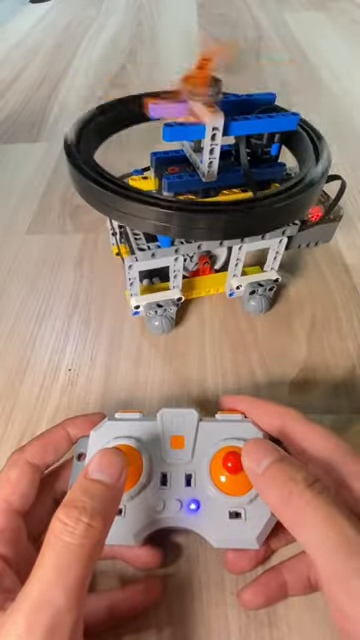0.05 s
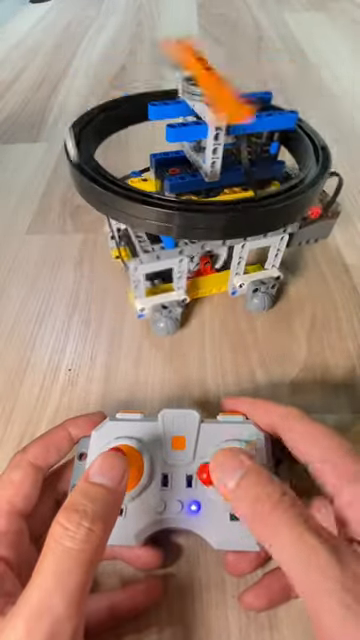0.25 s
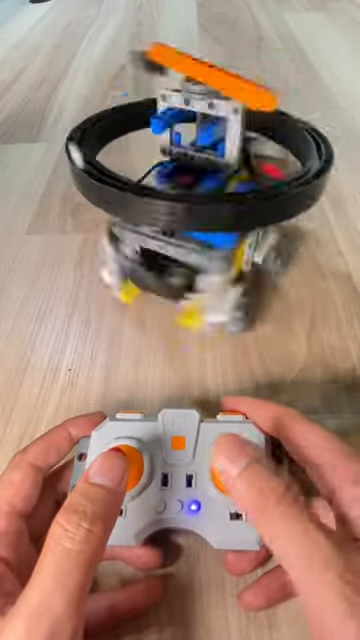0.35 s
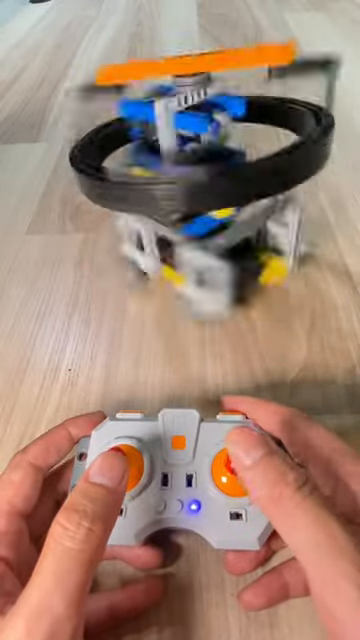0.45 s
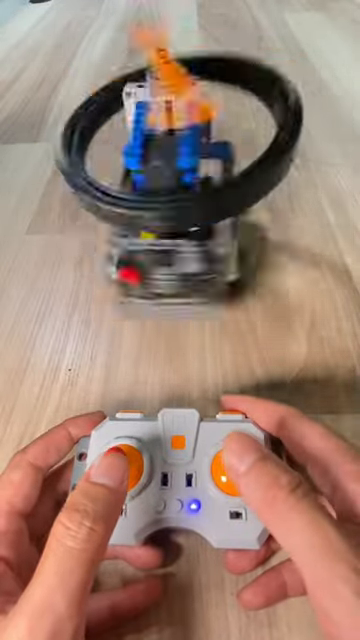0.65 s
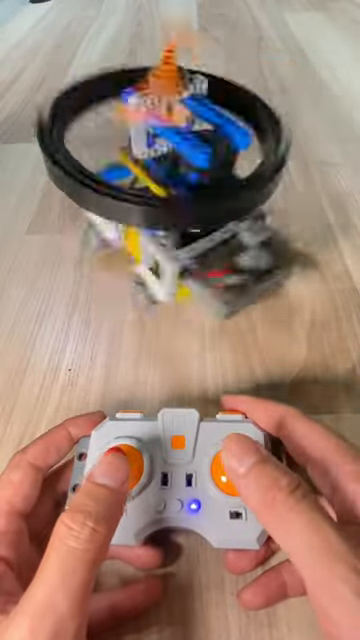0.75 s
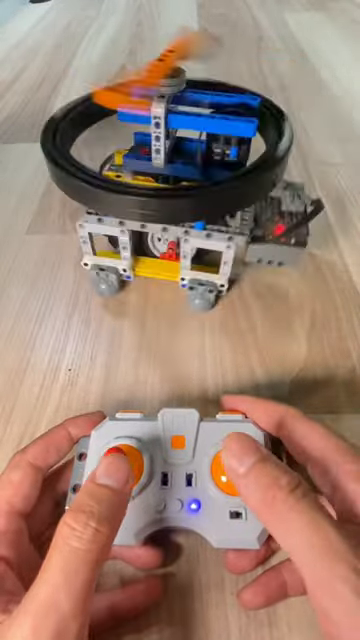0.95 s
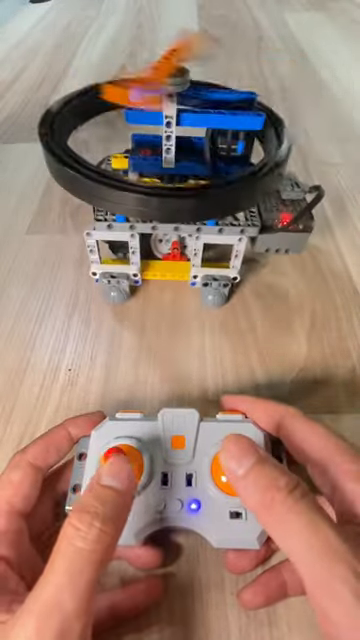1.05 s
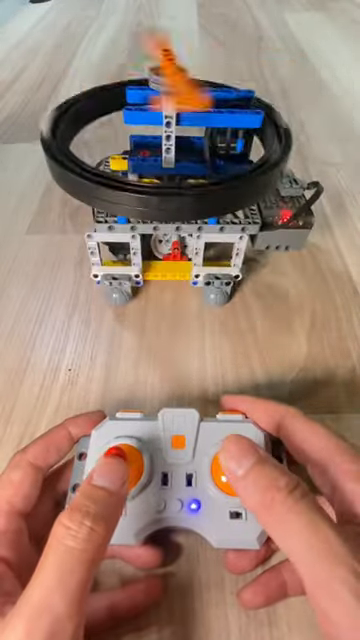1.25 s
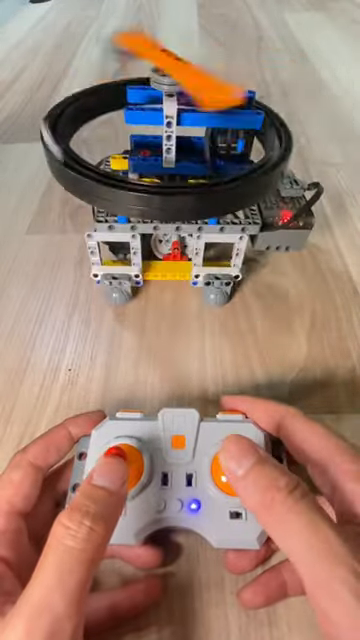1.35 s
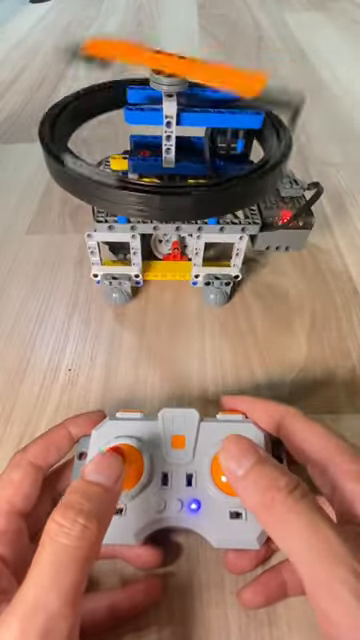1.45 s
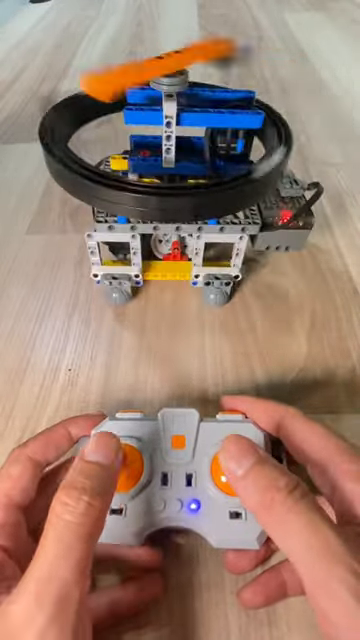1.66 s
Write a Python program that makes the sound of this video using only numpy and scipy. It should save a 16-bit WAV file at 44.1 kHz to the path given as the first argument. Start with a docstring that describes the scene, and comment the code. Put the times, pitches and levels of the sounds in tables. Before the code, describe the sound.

A small toy motor whines with hissy gear whirr, clicks as the drive engages, then wheels grind and jolt roughly on a wooden floor for under a second before the whine returns, sinking; close stereo, quiet room.

```python
"""A small motor whines and sinks in pitch while its gears whirr: a toy vehicle of plastic bricks on a wooden floor.
The drive engages with a click, a chassis mode groans, and the wheels grind and jolt across the boards.
Whine is a sum of harmonics, whirr is dense tooth contacts, grinding is slips and jolts ringing body modes.
Two close microphone ports hear it with their own balance and phase, over the low hum of a quiet room."""
import sys
import numpy as np
from scipy import signal
from scipy.fft import rfft, irfft
from scipy.io import wavfile

SR = 44100
rng = np.random.default_rng(int(sys.argv[2]) if len(sys.argv) > 2 else 0)


def inscribe(sig):
    """Save sig as 16-bit PCM at rate SR to the path in sys.argv[1].

    A 1-D sig is mono; a 2-D sig holds one channel per row.
    Samples are clipped to [-1, 1] before scaling.
    """
    pcm = np.round(np.clip(np.atleast_2d(sig).T, -1, 1) * 32767)
    wavfile.write(sys.argv[1], SR, pcm.astype(np.int16))


N = 74970

GRIND_START_S, GRIND_RISE_S = .213, .003
SLIPS_PER_S, SLIP_SPREAD_DB = 2500, 1.5


def from_db(db):
    """Decibels to amplitude factor."""
    return 10 ** (np.asarray(db) / 20)


def rms_one(x):
    """Scale a signal to rms 1."""
    return x / np.sqrt(np.mean(x ** 2) + 1e-20)


def in_time(rows):
    """Each column after the time column, as a curve over the scene."""
    s, *columns = np.transpose(rows)
    t = np.arange(N) / SR
    return [np.interp(t, s, c) for c in columns]


def at_hz(rows, hz, column=1):
    """One column of a frequency table, read along log frequency."""
    rows = np.array(rows)
    return np.interp(np.log(np.maximum(hz, 1)), np.log(rows[:, 0]), rows[:, column])


def drift(rate_hz):
    """Slow random wander of rms 1: noise through two equal low-pass poles."""
    r = np.exp(-2 * np.pi * rate_hz / SR)
    wander = signal.lfilter([1], [1, -2 * r, r * r], rng.standard_normal(N + SR))
    return rms_one(wander[SR:])  # the first second lets the filter settle


def colour(x, spectrum):
    """Shape a signal by a gain table over frequency; rms 1."""
    hz = np.arange(N // 2 + 1) * SR / N
    return rms_one(irfft(rfft(x) * from_db(at_hz(spectrum, hz)), N))


def contacts(rate_per_s, spread_db):
    """Random clicks of uneven size and either sign."""
    sizes = from_db(spread_db * np.minimum(rng.exponential(1, N), 5))
    signs = rng.choice([-1, 1], N)
    return sizes * signs * (rng.random(N) < rate_per_s / SR)


def ring(clicks, hz, t60_s):
    """One decaying mode: a two-pole resonator struck by the clicks."""
    r = from_db(-60 / (t60_s * SR))
    w = 2 * np.pi * hz / SR
    return signal.lfilter([0, np.sin(w)], [1, -2 * r * np.cos(w), r * r], clicks + 1e-18)


def whine():
    """Motor: harmonics of the commutator rate, coloured by the casing; higher ones wobble more in phase."""
    # motor run: t/s, commutator f/Hz, level/dB before the colouring, extra level of the shrill harmonics/dB
    motor_run = [(0, 663.5, -44.5, 9), (.08, 636.6, -47.5, 7.5), (.15, 617.5, -49, 15.5),
                 (.17, 621, -58, -14), (.98, 563, -76, -4), (1.02, 552, -46, -9), (1.07, 535.5, -48, -15),
                 (1.14, 520, -43.5, -10), (1.2, 508.3, -48, -15), (1.3, 496.6, -47, -3),
                 (1.4, 465, -51, -14), (1.5, 452, -46.5, -20), (1.6, 432, -51, -14),
                 (1.66, 414, -52.5, -22), (1.7, 405, -48, -15)]
    # casing colour of the whine: f/Hz, level/dB
    casing_colour = [(540, -24), (620, 2), (1300, -10), (1600, -7), (1850, -6), (2100, 1), (2350, -6),
                     (2600, -4), (2900, -14), (3200, -16), (3850, 0), (4350, -5), (4600, -11), (5100, -14),
                     (6400, -16)]
    # strength of each multiple of the commutator rate, from the first up: level/dB
    order_levels = [-4.5, -14, -3.5, -2.5, -3.5, -2.5, 1, -22, 2, -36, -9]
    shrill_from_hz = 2900
    flicker_db, flicker_hz = 1.8, 60
    segments, unbalance = 6, .35  # commutations per shaft turn, depth of the once-a-turn throb

    hz, db, shrill_db = in_time(motor_run)
    hz = hz * (1 + .004 * drift(36.1))  # relative pitch waver
    turn = 2 * np.pi * np.cumsum(hz) / SR
    wobble = .0086 * drift(66)
    throb = 1 + unbalance * np.sin(turn / segments)
    total = np.zeros(N)
    for k, order_db in enumerate(order_levels, start=1):
        level_db = db + shrill_db * (k * hz > shrill_from_hz) + order_db
        level_db = level_db + at_hz(casing_colour, k * hz) + flicker_db * drift(flicker_hz)
        total += from_db(level_db) * np.sin(k * turn + k * k * (1 + wobble))
    return throb * total


def whirr():
    """Gears: dense tooth contacts, swelling briefly as they chatter; load rings the housing."""
    # level of the gear train: t/s, level/dB
    gear_level = [(0, -36), (.16, -37), (.19, -34), (.21, -44), (.26, -44.5), (.33, -38.5), (.41, -34),
                  (.44, -29.5), (.49, -32), (.55, -35.5), (.68, -43), (.88, -46.5), (1.0, -39.5),
                  (1.09, -38), (1.4, -40.5), (1.7, -43)]
    # swells where the gears chatter under load: t/s, gain level/dB
    chatter_swells = [(0.345, 2.5), (0.587, 3.5), (0.639, 5.5), (0.709, 9), (0.762, 7.5), (.83, 8.5),
                      (.895, 9.5), (0.962, 4.5)]
    # gear train colour: f/Hz, level/dB per Hz
    gear_colour = [(400, -20.5), (1200, -15.5), (2000, -12.5), (2600, -10.5), (3200, -13), (3900, -8.5),
                   (4600, -8), (5300, -9), (6000, -26), (6600, 0), (7400, -1.5), (8300, -9.5), (9500, -21),
                   (11000, -16), (12400, -18), (14000, -21.5), (15500, 0.5), (16000, -45)]
    # ringing of the loaded housing: t/s, level/dB relative to the whirr
    rasp_level = [(0, -12), (.25, -13.5), (.35, -6), (.85, -4.5), (1.0, -7.5), (1.7, -3.5)]
    # narrow wavering tones of the gear housing: f/Hz, level/dB relative to the whirr
    housing_tones = [(3870, -18), (4820, -16), (5130, -20), (5520, -19), (5780, -16), (6080, -16),
                     (6260, -19)]
    teeth_per_s, rasp_teeth_per_s, tooth_spread_db = 8000, 3000, 2.0
    chatter_width_s, rasp_chatter = .014, .2  # rasp_chatter: extra share of chatter that rings the housing
    rasp_hz, rasp_t60_s = 6050, .0016  # t60 of each of two resonators in a row
    tone_wander, tone_flicker_db = .01, 4  # wander is a relative pitch spread
    flicker_db, flicker_hz = .7, 82

    db, = in_time(gear_level)
    rasp_db, = in_time(rasp_level)
    t = np.arange(N) / SR
    chatter_db = sum(gain * np.exp(-.5 * ((t - s) / chatter_width_s) ** 2) for s, gain in chatter_swells)
    db = db + chatter_db
    rasp_db = rasp_db + rasp_chatter * chatter_db

    teeth = colour(contacts(teeth_per_s, tooth_spread_db), gear_colour)
    rasp = ring(contacts(rasp_teeth_per_s, tooth_spread_db), rasp_hz, rasp_t60_s)
    rasp = rms_one(ring(rasp, rasp_hz, rasp_t60_s))
    tones = np.zeros(N)
    for hz, tone_db in housing_tones:
        phase = 2 * np.pi * hz / SR * np.cumsum(1 + tone_wander * drift(12))
        tones += from_db(tone_db + tone_flicker_db * drift(19)) * np.sin(phase)
    return from_db(db + flicker_db * drift(flicker_hz)) * (teeth + from_db(rasp_db) * rasp + tones)


def grind():
    """Wheels on the boards: slips and jolts strike the body modes, in three groups from low to upper."""
    # grinding: t/s, level/dB of the rub, middle modes relative level/dB, upper modes relative level/dB
    grind_level = [(0.21, -27.5, -9, -9), (0.232, -29.5, -5.5, -16.5), (0.302, -24.5, -3, -10.5),
                   (0.344, -18.5, -5.5, -13), (0.37, -26, 1.5, -5), (0.396, -28.5, 5.5, -2.5),
                   (0.422, -26, -3.5, -2), (0.456, -21.5, 2.5, -3), (0.492, -15.5, -11.5, -12.5),
                   (0.516, -25, 1, -9), (0.55, -19.5, -10, -18), (0.576, -28, 3.5, -8),
                   (0.6, -24, -3.5, -15), (0.648, -30.5, 0.5, -12), (0.7, -24.5, -5, -18),
                   (.725, -29.5, -5, -14), (.752, -25, -7, -19.5), (.83, -31.5, -8, -16.5),
                   (0.87, -28.5, -14.5, -18.5), (0.9, -33, -14, -16.5), (0.925, -33.5, -11, -23),
                   (0.96, -40, -15, -20), (1.0, -42, -12, -8), (1.015, -52.5, -9, -9)]
    # jolts over the wood grain: t/s, strike level/dB, middle and upper modes relative level/dB
    grain_jolts = [(.215, -32, -8), (.279, -20, -7), (.340, -16.5, 1), (0.343, -16.5, -4), (.379, -29, 15),
                   (.424, -17, 6), (0.4307, -14, 6.5), (.457, -20.5, -1), (.476, -21.5, 9.5),
                   (.485, -10, -5), (.51, -21.5, 5), (.54, -17, -4), (.556, -28, -2), (.62, -26, 6),
                   (.698, -20, -13), (.714, -34, 0), (.733, -26, -7), (0.745, -48, 3), (.755, -24, 4),
                   (.789, -33.5, -6.5), (.81, -28, -2), (.828, -27, -8), (.849, -26, -8), (.863, -25, -15),
                   (0.875, -37, -17), (.882, -37, -6), (.914, -30.5, 1), (.929, -30, -5), (.992, -46, -11),
                   (1.0, -41, 2)]
    # chassis and floorboard modes: f/Hz, level/dB, t60/s under the slips
    body_modes = [(397, -16, 0.013), (483.7, -5.5, 0.069), (544, -2.5, 0.046), (608.8, 0, 0.062),
                  (668.8, -2, 0.083), (841.4, -9.5, 0.12), (942, -2, 0.032), (1047, -4.5, 0.051),
                  (1116, -9.5, 0.044), (1305, -16, 0.037), (1463, 0.5, 0.03), (1677, -4, 0.042),
                  (2050, -7.5, 0.0086), (2218, -0.5, 0.022), (2513, -4, 0.025), (3260, -5, 0.0017)]
    group_edges_hz, board_cut_hz = (760, 1400), 431
    jolt_dull_db, jolt_damping = 22, .42  # further loss of the upper modes; ring time factor under load
    grind_stop_s, fade_s = 1.03, .017

    db, middle_db, upper_db = in_time(grind_level)
    t = np.arange(N) / SR
    slips = contacts(SLIPS_PER_S, SLIP_SPREAD_DB)
    jolts = np.zeros((3, N))
    for s, strike_db, bright_db in grain_jolts:
        group_db = np.array([0, bright_db, bright_db - jolt_dull_db])
        jolts[:, int(s * SR)] = from_db(strike_db + group_db)

    groups, knocks = np.zeros((3, N)), np.zeros(N)
    for hz, mode_db, t60_s in body_modes:
        group = np.searchsorted(group_edges_hz, hz)
        groups[group] += from_db(mode_db) * rms_one(ring(slips * rng.standard_normal(N), hz, t60_s))
        strikes = jolts[group] * rng.uniform(.48, .51, N)
        knocks += from_db(mode_db) * ring(strikes, hz, jolt_damping * t60_s)

    # a fainter rub leads in for 30 ms before the grinding rises
    lead_in = .21 * (t > GRIND_START_S - .03)
    on = np.clip((t - GRIND_START_S) / GRIND_RISE_S, lead_in, 1)
    on = on * np.clip((grind_stop_s - t) / fade_s, 0, 1)
    rub = sum(from_db(g) * rms_one(x) for g, x in zip((0, middle_db, upper_db), groups))
    high_pass = signal.butter(8, board_cut_hz, "high", fs=SR, output="sos")
    return signal.sosfilt(high_pass, on * from_db(db) * rub + knocks)


def groan():
    """As the wheels break loose one chassis mode sings briefly: a steady tone plus the mode rung by slips."""
    hz, t60_s, tone_db = 655, .1, -25
    fade_from_s, fade_s = .262, .02
    t = np.arange(N) / SR
    rise = np.clip((t - GRIND_START_S) / GRIND_RISE_S, 0, 1)
    fade = np.clip(1 - (t - fade_from_s) / fade_s, 0, 1)
    rough = rms_one(ring(contacts(SLIPS_PER_S, SLIP_SPREAD_DB), hz, t60_s))
    return from_db(tone_db) * rise * fade * (np.sin(2 * np.pi * hz * t) + .55 * rough)


def engage():
    """The drive engaging: short plastic ticks, each ringing six quick modes of alternating sign."""
    # ticks: t/s, strike level/dB before the modes add and are halved
    drive_ticks = [(.188, -25), (.190, -25), (.193, -30)]
    modes_hz, t60_s = (500, 1000, 1800, 2200, 2800, 3550), .007
    train = np.zeros(N)
    for s, db in drive_ticks:
        train[int(s * SR)] = from_db(db)
    return sum((-1) ** k * ring(train, hz, t60_s) for k, hz in enumerate(modes_hz)) / 2


def ports(common, own):
    """Each close microphone port has its balance and phase, and hears some of the vehicle on its own."""
    # ports: f/Hz, left minus right level/dB, left leads/rad, level/dB of the share heard by one port alone
    port_response = [(170, -5, 0, -12), (340, -17, .6, -2), (430, -14, 1.4, -4), (520, -7, 2.1, -8),
                     (700, -4, 2.3, -8), (860, -3, 1.3, -2), (1030, -3, .4, -7), (1550, 0, .6, -6),
                     (2200, -1, .3, -7), (3000, -2, 1.3, -3), (3800, -4, .5, -5), (4500, -5, 1.3, -3),
                     (5300, -2, .7, -2), (6000, -2, 1.2, -2), (6600, -1, 2.7, -9), (7050, 0, 3.14, -22),
                     (7800, 0, 3.14, -22), (8300, -1, 4.2, -7), (9300, 0, 6.1, -12), (10000, 0, 6.28, -25),
                     (10900, 0, 6.28, -20), (11500, 0, 6.8, -8), (12400, 0, 8.6, -10),
                     (12900, 0, 9.42, -26), (14800, 0, 9.42, -26), (15300, 0, 11, -6)]
    hz = np.arange(N // 2 + 1) * SR / N
    side = np.array([[.5], [-.5]])  # half of each difference to the left, half to the right
    turned = np.exp(1j * side * at_hz(port_response, hz, column=2)) * rfft(common)
    alone = from_db(at_hz(port_response, hz, column=3)) * rfft(own)
    balance = from_db(side * at_hz(port_response, hz))
    return irfft((turned + alone) * balance, N)


def hum():
    """Quiet room: low coloured noise, nearly alike in both ports."""
    # room hum colour: f/Hz, level/dB per Hz
    hum_colour = [(20, -5.5), (35, -29), (55, 1), (90, -9), (140, -1), (200, -12), (260, -5), (310, -9),
                  (380, -20.5), (1000, -27), (3000, -51)]
    # hum balance: f/Hz, left minus right level/dB
    hum_lean = [(50, 0), (100, -1), (170, -5.5), (300, -9)]
    shared_db, own_db = -48.5, -13.5  # level of the shared part; share in one port alone, relative to it
    common, left, right = (colour(rng.standard_normal(N), hum_colour) for _ in range(3))
    hz = np.arange(N // 2 + 1) * SR / N
    lean = from_db(np.array([[.5], [-.5]]) * at_hz(hum_lean, hz))
    both = common + from_db(own_db) * np.array([left, right])
    return from_db(shared_db) * irfft(lean * rfft(both), N)


def scene():
    """The vehicle through the two ports, over the room; gears and wheels also sound apart in each port."""
    common, left, right = (whirr() + grind() for _ in range(3))
    vehicle = common + whine() + groan() + engage()
    return ports(vehicle, np.array([left, right])) + hum()


def record(dry):
    """A steep low-pass cuts the top, 70 dB down from 16 kHz."""
    return signal.sosfilt(signal.cheby2(12, 70, 16000, fs=SR, output="sos"), dry)


dry = scene()
out = record(dry)
inscribe(out)
```